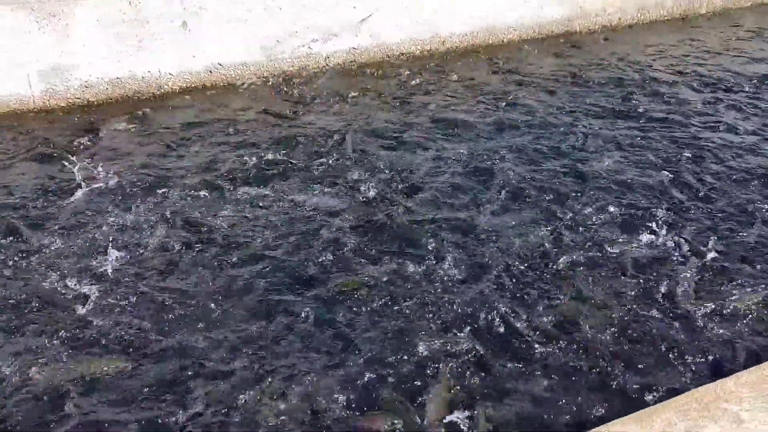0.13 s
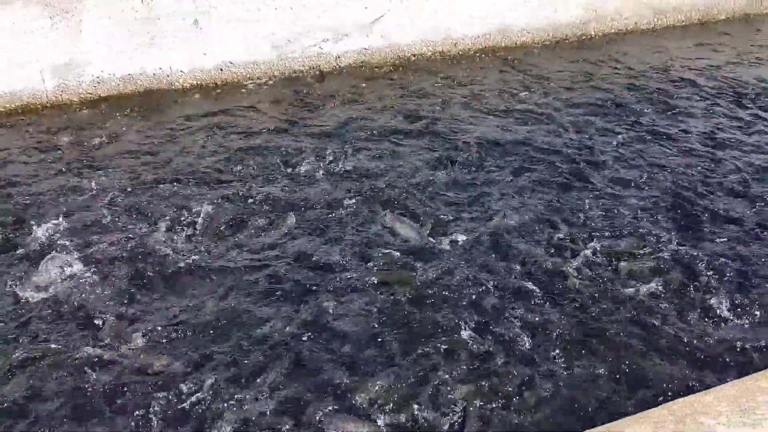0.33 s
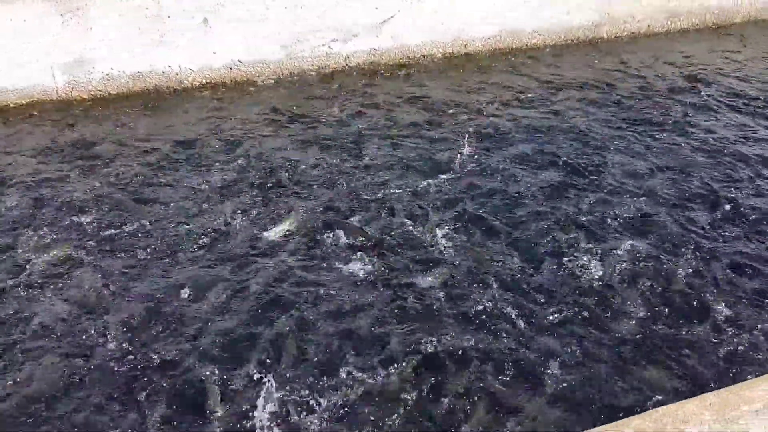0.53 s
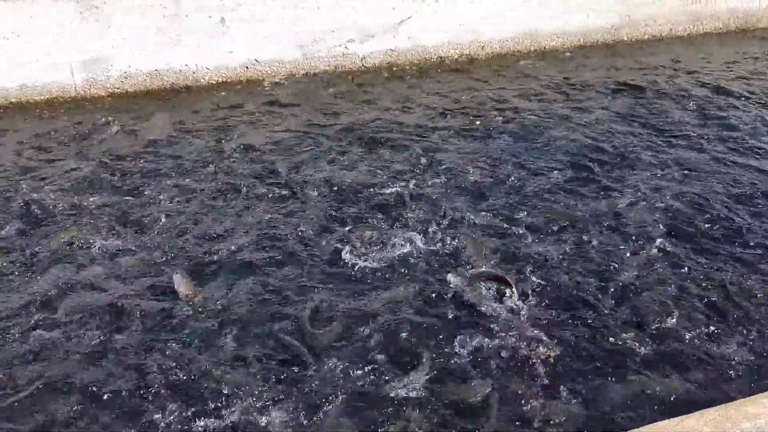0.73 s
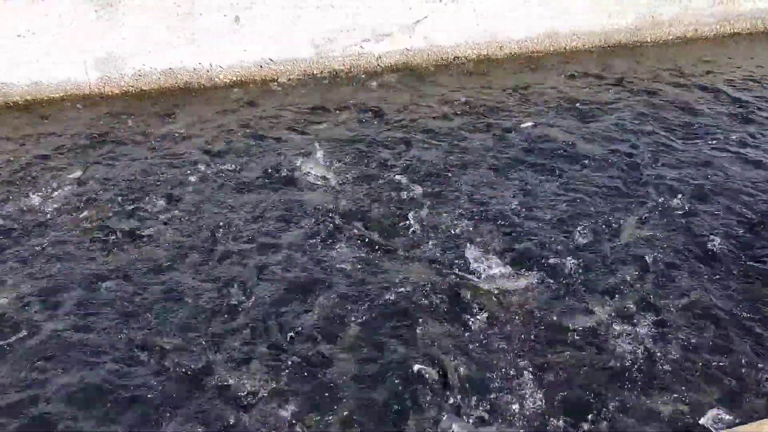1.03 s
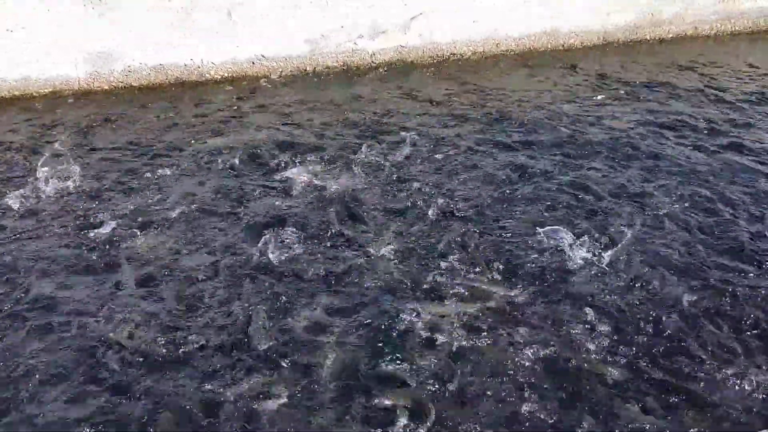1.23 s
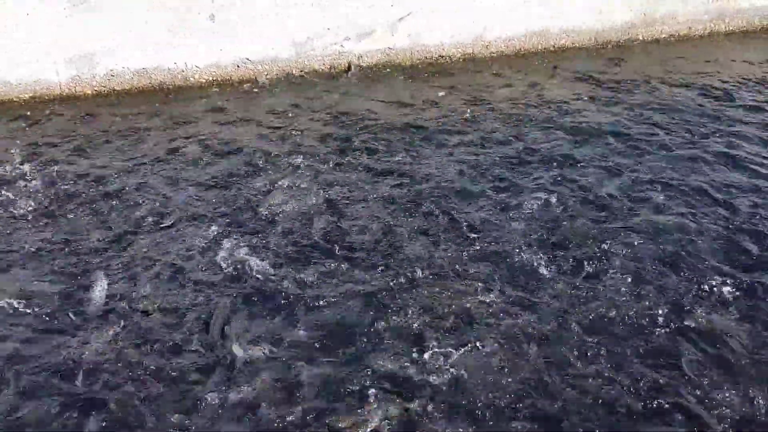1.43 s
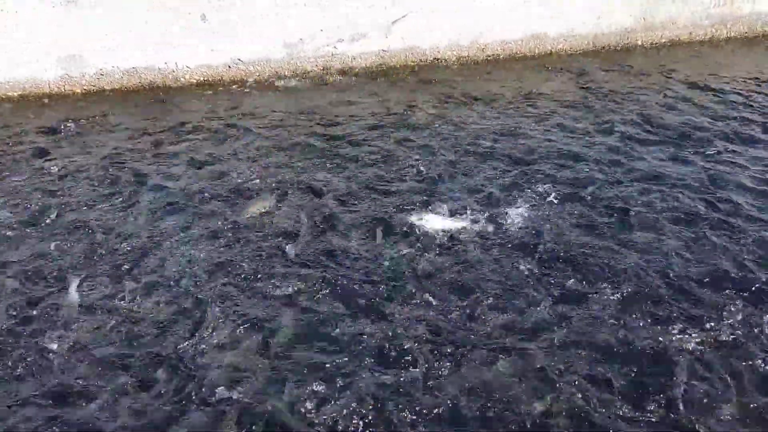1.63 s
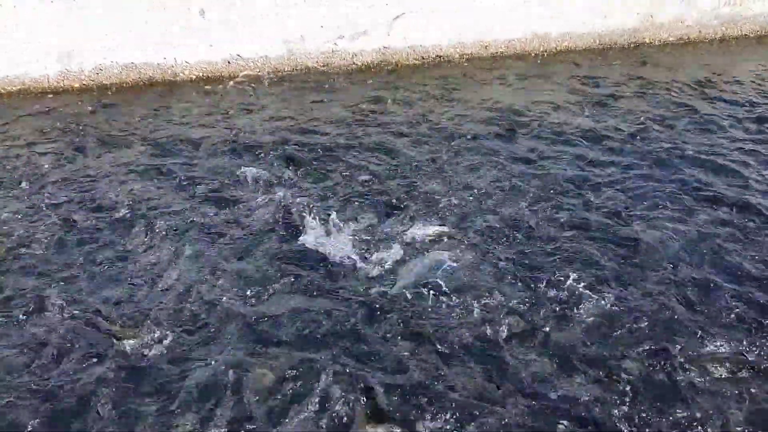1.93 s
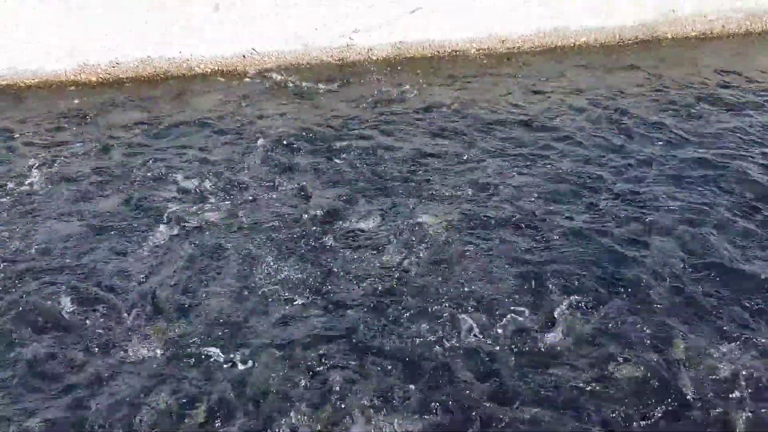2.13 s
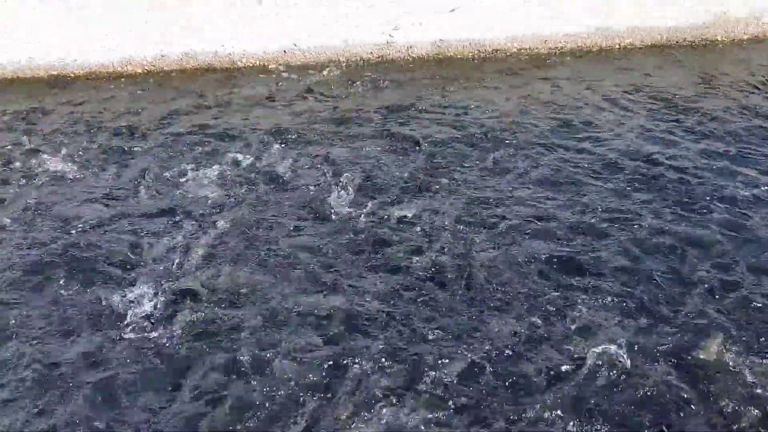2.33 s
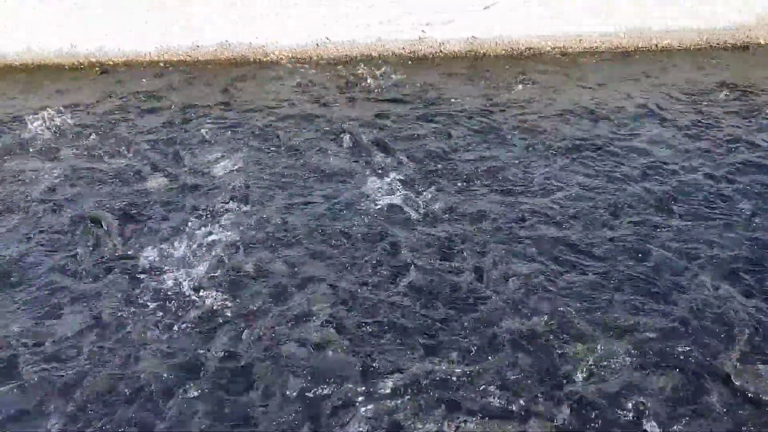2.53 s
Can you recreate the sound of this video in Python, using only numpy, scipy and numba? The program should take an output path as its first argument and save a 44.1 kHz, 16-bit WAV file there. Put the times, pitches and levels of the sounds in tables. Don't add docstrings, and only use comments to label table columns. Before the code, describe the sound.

Many fish thrash at the surface a few metres away: wet tail slaps, bubbling plops and bright crackling spray in uneven bursts, with short concrete echo and faint low pump rumble, heard on a hand-held phone.

```python
import sys
import numpy as np
from scipy import signal
from scipy.fft import rfft, irfft
from scipy.io import wavfile
from scipy.ndimage import uniform_filter1d
from numba import njit

SR = 44100
rng = np.random.default_rng(int(sys.argv[2]) if len(sys.argv) > 2 else 0)


def boost(x):
    u = np.asarray(x, float) / 20
    return 10 ** u


def dump_mix(stems):
    frames = np.atleast_2d(stems).T
    limited = np.clip(frames, -1, 1)
    pcm = np.round(limited * 32767).astype(np.int16)
    wavfile.write(sys.argv[1], SR, pcm)


N = 118188
PORT_LAG_S = 0.00056
BIGGEST = 3.0


def colour(x, table, sign=1):
    hz, db = np.array(table).T
    log_f = np.log(np.maximum(np.fft.rfftfreq(N, 1 / SR), 1))
    return irfft(rfft(x) * boost(sign * np.interp(log_f, np.log(hz), db)), N)


def curve(table, order):
    rows = np.array(table)
    return np.interp(np.arange(N) / SR, rows[:, 0], rows[:, order])


def unit(x):
    return x / np.sqrt(np.mean(x ** 2))


def walk(rate_hz):
    hold = int(SR / rate_hz)
    steps = np.repeat(rng.standard_normal(N // hold + 1), hold)
    return uniform_filter1d(uniform_filter1d(steps, hold), hold)[:N]


@njit
def ring(rows, n, sr, swell):
    out = np.zeros((2, n))
    for r in rows:
        tau = r[2] / r[1] * sr
        for port in range(2):
            at = int((r[0] + (r[6] if port == 0 else 0.)) * sr)
            phase = 0.
            for i in range(max(0, -at), min(int(6 * tau) + 2, n - at)):
                u = i / tau
                phase += 2 * np.pi * min(r[1] * (1 + r[3] * u), .45 * sr) / sr
                envelope = np.exp(-u) * (1 - np.exp(-u / swell))
                out[port, at + i] += r[4 + port] * envelope * np.sin(phase)
    return out


def grains(t, hz, cycles, glide, db, pan_db, lag, swell=0.37):
    left, right = boost(db + pan_db / 2), boost(db - pan_db / 2)
    columns = np.broadcast_arrays(t, hz, cycles, glide, left, right, lag * PORT_LAG_S)
    return ring(np.ascontiguousarray(np.array(columns, float).T), N, float(SR), float(swell))


def cloud(count, lo_hz, hi_hz, cycles, glide, scatter_db, pan_db):
    u = rng.random((count, 4)).T
    g = rng.standard_normal((count, 2)).T
    hz = lo_hz * (hi_hz / lo_hz) ** u[1]
    db = 20 * np.log10(hz / hi_hz) + scatter_db * np.minimum(-np.log(1 - u[2]), BIGGEST)
    return unit(grains(u[0] * N / SR, hz, cycles * (.5 + u[3]), glide, db, pan_db * g[0], g[1]))


def cluster(table, count, spread, cycles, glide, rest_db, lead_db, rise=0.0066, scatter_db=5.5):
    t, db, hz, decay = np.array(table).T[:, :, None]
    u = rng.random((3, len(t), count))
    g = rng.standard_normal((3, len(t), count))
    first = np.arange(count) < 2
    late = np.where(first, 0.001925 * np.arange(count), u[0] ** 1.5 * np.clip(decay, .01, .5))
    detune = np.where(first, .3, 1) * np.clip(g[0], -1.3, 2)
    onset_db = 20 * np.log10(np.clip(late / rise, .15, 1))
    chance_db = scatter_db * np.minimum(-np.log(1 - u[1]), BIGGEST)
    size = db + np.where(first, lead_db, rest_db - 30 * late / decay + onset_db + chance_db)
    pitch = np.clip(hz * np.exp(spread * detune), 300, 15500)
    length = cycles * np.where(first, .6, .5 + u[2])
    lag = g[2, :, :1] + 0.29 * g[2]

    def flat(v):
        return np.broadcast_to(v, late.shape).ravel()

    return grains(flat(t + late), flat(pitch), flat(length), glide,
                  flat(size), flat(3 * g[1] * ~first), flat(lag))


# (frequency [Hz], level [dB])
RUMBLE_COLOUR = [(20, -34), (37, -23), (66, 0), (95, -0.5), (130, 8.5), (165, 2), (275, -16.5), (450, -23)]
# (time [s], level [dB])
GUSTS = [(0, -53.5), (.38, -52), (.43, -49), (.56, -52), (.7, -49), (.9, -56), (1.32, -50), (1.52, -59.5),
         (1.95, -50), (2.15, -54), (2.4, -53.5)]


def rumble():
    shape = RUMBLE_COLOUR + [(900, -111)]
    shared = unit(colour(rng.standard_normal(N), shape))
    other = unit(colour(rng.standard_normal(N), shape))
    gust = curve(GUSTS, order=1)
    mean = gust.mean()
    left = shared * boost(gust + 2.0 + 2.3 * walk(10.24))
    right_db = mean - 11.5 + 2.0 * (gust - mean)
    right = (shared + 0.33 * other) * boost(right_db + 3.5 * walk(6.4))
    return np.array([left, right])


# (time [s], churn level [dB], spray level [dB])
SHOAL = [(0, -41, -43), (.27, -48.5, -44), (.33, -50.5, -55.5), (.42, -40.5, -53.5), (.54, -54, -59),
         (.72, -49.5, -53.5), (.85, -44, -51.5), (.89, -39.5, -42), (1.15, -49.5, -47.5),
         (1.43, -45.5, -52), (1.6, -49, -55.5), (1.82, -52, -51.5), (2.0, -45.5, -46), (2.3, -55, -44.5),
         (2.42, -47.5, -56), (2.52, -44.5, -43.5), (2.68, -46, -40.5)]
# (frequency [Hz], level [dB])
BUBBLE_COLOUR = [(250, -48), (390, -19.5), (490, -15.5), (570, -1), (770, 5.5), (1200, 6), (1500, -18),
                 (2400, -35)]


def churn():
    bubbles = cloud(count=1600, lo_hz=405.2, hi_hz=1506.0, cycles=6.86, glide=0.052,
                    scatter_db=3., pan_db=4.5)
    return unit(colour(bubbles, BUBBLE_COLOUR)) * boost(curve(SHOAL, order=1) + 2.2 * walk(14))


# (frequency [Hz], level [dB])
SPRAY_COLOUR = [(880, -62), (1500, -2.5), (2110, -7), (3380, -1.5), (3900, -8.5), (6900, -7), (13000, 8.5),
                (15700, -1.5), (16500, -62)]


def spray():
    crackle = cloud(count=12000, lo_hz=1800, hi_hz=16000, cycles=6, glide=.02, scatter_db=3.4, pan_db=4.)
    fizz = cloud(count=2500, lo_hz=1721, hi_hz=8690, cycles=10.6, glide=0.0093,
                 scatter_db=5.0, pan_db=-4.0)
    mix = crackle + fizz + boost(-4.5) * rng.standard_normal((2, N))
    return unit(colour(mix, SPRAY_COLOUR)) * boost(curve(SHOAL, order=2) + 2.5 + 3.0 * walk(15.3))


# (time [s], peak level [dB], pitch [Hz])
TICKS = [(0.0493, -26, 12100), (0.0797, -19, 12800), (0.1316, -24, 9480), (0.2064, -23, 12500),
         (0.2563, -23, 10600), (0.4653, -35, 11800), (0.5801, -39, 8220), (0.6654, -30, 11400),
         (0.6764, -30, 11700), (0.7512, -28, 11600), (0.8076, -31, 9880), (0.8749, -20, 11400),
         (0.8919, -19, 12800), (1.0006, -24, 11600), (1.0146, -22, 13300), (1.0304, -26, 11800),
         (1.1233, -26, 12200), (1.2136, -28, 13300), (1.2326, -33, 8060), (1.26, -28, 11200),
         (1.4696, -20, 13100), (1.4965, -22, 11400), (1.5604, -26, 11800), (1.709, -32, 12000),
         (1.7754, -33, 12800), (1.8347, -35, 7890), (1.8916, -26, 13500), (1.9345, -27, 11700),
         (2.0103, -25, 8160), (2.1181, -24, 13200), (2.1849, -24, 12500), (2.2263, -20, 11500),
         (2.3017, -20, 13000), (2.3164, -24, 11400), (2.3765, -26, 15000), (2.4309, -29, 13300),
         (2.5047, -23, 11500), (2.5331, -25, 11900), (2.6, -22, 11400), (2.6179, -24, 11500),
         (2.6484, -24, 11400), (2.6534, -16, 10800)]


def ticks():
    t, peak_db, hz = np.array(TICKS).T
    lag = .3 * rng.standard_normal(len(t))
    out = np.zeros((2, N))
    for late_s, ratio, gain_db in [(.0012, 1, 14), (.0014, 1.18, 9), (.0016, .8, 3)]:
        pitch = np.minimum(hz * ratio, 15500)
        out += grains(t + late_s, pitch, 3., 0., 1.3 * peak_db + gain_db, 0., lag, swell=.4)
    return out


# (time [s], level [dB], coarse drops relative to it [dB], decay [s])
BURSTS = [(0.079, -15.5, -16, 0.095), (0.208, -10.5, -4, 0.033), (0.2582, -13, -13, 0.11),
          (0.365, -47, -17, .08), (0.463, -24, -25, .06), (0.58, -28.5, -5, .1), (0.662, -24, -25, 0.13),
          (0.753, -35, -8, .08), (0.808, -25.5, -1, 0.043), (0.8728, -15.5, -0.5, .14),
          (1.001, -30, -25, 0.021), (1.0163, -15, -9.5, 0.19), (1.233, -30, -5, 0.031),
          (1.257, -16.5, -3.5, 0.065), (1.469, -21, -18, 0.036), (1.496, -14.5, -11.5, 0.2),
          (1.69, -24, -5, 0.053), (1.775, -23, -10.5, 0.077), (1.833, -42, -10, 0.089),
          (1.893, -26.5, -4.5, 0.16), (2.0134, -20, -1.5, 0.087), (2.037, -16, -6, 0.093),
          (2.0761, -13.5, -13.5, 0.065), (2.118, -15, -7.5, 0.12), (2.1844, -16.5, -16.5, 0.089),
          (2.2254, -21.5, -26, 0.17), (2.3004, -16.5, -14.5, .12), (2.376, -37, 1, 0.11),
          (2.429, -39, -3.5, 0.24), (2.485, -20, -5, 0.043), (2.505, -24, -7, 0.19), (2.598, -23, -4, .14)]


def bursts():
    t, db, coarse_db, decay = np.array(BURSTS).T
    one = np.ones(len(t))
    fine = cluster(np.c_[t - .007, db, 12000 * one, decay], count=130, spread=0.191, cycles=5,
                   glide=0.0016, rest_db=-13.5, lead_db=-40, rise=0.0063, scatter_db=3.0)
    coarse = cluster(np.c_[t - .004, db + coarse_db, 5900 * one, .8 * decay], count=60, spread=0.25,
                     cycles=7, glide=0.055, rest_db=-12.5, lead_db=-62, rise=0.01, scatter_db=3.5)
    return fine + coarse


# (time [s], peak level [dB], pitch [Hz])
PLOPS = [(0.023, -38.5, 530), (0.08, -34.5, 508), (0.085, -33.5, 910), (0.11, -44, 477), (0.248, -47, 496),
         (0.305, -49.5, 525), (0.118, -35, 845), (0.205, -29, 1084), (0.393, -37.5, 868), (0.436, -36, 625),
         (0.739, -34.5, 970), (0.761, -30.5, 885), (0.875, -35, 940), (0.91, -29.5, 992), (0.929, -31, 872),
         (1.015, -31.5, 995), (1.078, -23.5, 722), (1.1, -34.5, 576), (1.134, -31.5, 649),
         (1.203, -36.5, 708), (1.328, -32.5, 906), (1.393, -30, 870), (1.528, -34, 1070),
         (1.656, -29.5, 965), (1.979, -35, 917), (2.014, -32, 595), (2.081, -29.5, 736), (2.042, -38, 680),
         (2.125, -52, 805), (2.153, -43, 835), (2.183, -43.5, 1160), (2.348, -36, 1185), (2.435, -39, 1214),
         (2.465, -29, 940), (2.482, -37, 1174), (2.538, -32, 757), (2.562, -28.5, 1270), (2.578, -31, 589)]


def plops():
    rows = np.array(PLOPS)
    t, db, hz = rows.T
    g = rng.standard_normal((len(rows), 2)).T
    lead = grains(t, hz * .95, 5.06, 0.0517, db + 8, 3 * g[0] + 2.7, g[1], swell=0.8)
    rest = cluster(np.c_[rows, np.full(len(rows), .11)], count=24, spread=0.1574, cycles=7.3,
                   glide=0.033, rest_db=-9.5, lead_db=-38, scatter_db=3.5)
    gurgle = grains(np.array([2.212]), 720, 9.2, 0.15, -23.5, 3.6, 0., swell=0.91)
    return lead + rest + gurgle


# (time [s], peak level [dB], pitch [Hz], decay [s])
SLAPS = [(0.2049, -28, 3200, 0.17), (0.3686, -36, 4800, 0.091), (0.396, -35, 4640, 0.032),
         (0.452, -41, 2630, 0.08), (0.5551, -37, 3460, 0.12), (0.7327, -32.5, 4500, 0.04),
         (0.7443, -29.5, 2500, 0.1), (0.869, -18, 3160, 0.074), (0.9104, -29.5, 1854, 0.18),
         (0.9654, -28.5, 2200, 0.14), (1.0283, -27.5, 1770, 0.06), (1.077, -24, 2036, 0.15),
         (1.078, -21.5, 2950, 0.029), (1.1448, -30.5, 2220, 0.18), (1.234, -35.5, 1786, 0.1),
         (1.2595, -28, 3010, 0.049), (1.4586, -35, 2840, 0.05), (1.4969, -34.5, 2350, 0.24),
         (1.5307, -28, 2720, 0.17), (1.666, -25, 2340, 0.12), (1.8751, -23.5, 5770, 0.017),
         (1.933, -27.5, 2900, 0.049), (1.9618, -30.5, 3280, 0.024), (2.043, -25.5, 3030, 0.14),
         (2.0787, -27.5, 3140, 0.14), (2.563, -42, 1880, 0.11)]


def slaps():
    return cluster(SLAPS, count=70, spread=0.19, cycles=4.5, glide=0.026,
                   rest_db=-13, lead_db=1.5, scatter_db=4.5)


def wall_echo(water):
    t60_s, level_db = 0.11, -7
    t = np.arange(SR // 3) / SR
    tail = rng.standard_normal((2, len(t))) * boost(-60 * t / t60_s) * (t > .004)
    tail /= np.sqrt((tail ** 2).sum(axis=1, keepdims=True))
    return boost(level_db) * signal.fftconvolve(water, tail, axes=1)[:, :N]


# (frequency [Hz], left minus right [dB])
PORTS = [(200, 13.5), (400, 0), (750, -10), (1200, -12), (2400, -10), (4400, -7.5), (8500, -4.5),
         (12500, -12)]


def port_shading(water):
    return np.array([colour(water[0], PORTS, sign=0.92), colour(water[1], PORTS, sign=-0.3)])


def scene():
    water = churn() + spray() + plops() + slaps() + ticks() + bursts()
    water = water + wall_echo(water)
    hiss = boost(-70) * rng.standard_normal((2, N))
    return port_shading(water) + rumble() + hiss


def patchy_treble(x):
    mask_db, mask_from_hz, patch_db = -13, 3500, 2.5
    f, _, z = signal.stft(x, SR, nperseg=1024)
    patch = np.repeat(rng.standard_normal((65, z.shape[2])), 8, axis=0)[:len(f)]
    patch = uniform_filter1d(patch, size=7, axis=1)
    z = z * boost(patch_db * patch / patch.std() * (f > 1500)[:, None])
    power = np.abs(z) ** 2
    treble = f > mask_from_hz
    loudness = np.log(power[:, treble].mean(axis=1, keepdims=True) + 1e-18)
    mask = np.exp(uniform_filter1d(loudness, size=7, axis=2)) * boost(mask_db)
    around = uniform_filter1d(uniform_filter1d(power, size=5, axis=1), size=5, axis=2)
    local = np.sqrt(power * around)
    z = np.where(treble[:, None] & (local < mask), 0, z) * (f < 16050)[:, None]
    return signal.istft(z, SR, nperseg=1024)[1][:, :N]


def band_limit(x):
    return signal.sosfilt(signal.butter(12, 16630, fs=SR, output="sos"), x)


def record(dry):
    mix = patchy_treble(dry)
    return band_limit(mix)


dry = scene()
out = record(dry)
dump_mix(out)
```